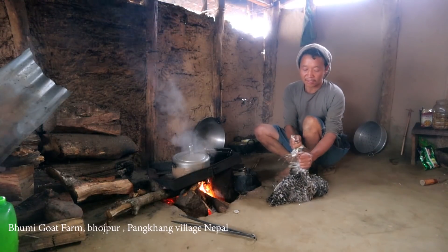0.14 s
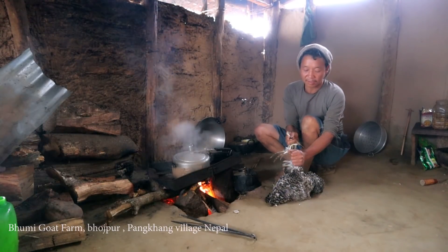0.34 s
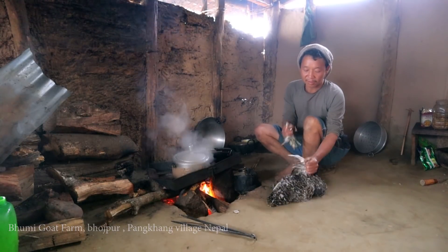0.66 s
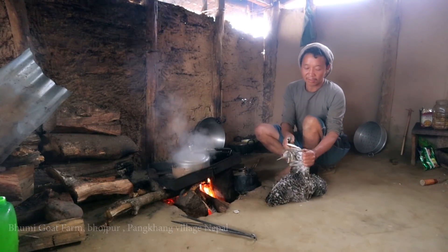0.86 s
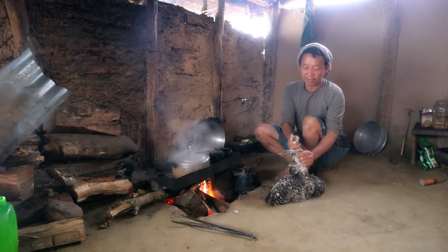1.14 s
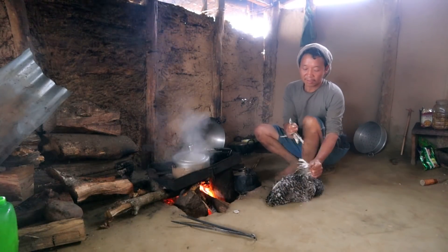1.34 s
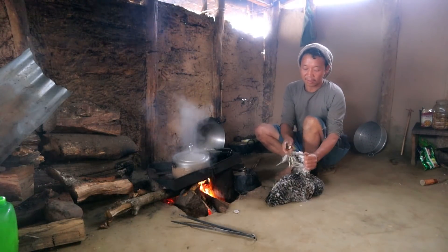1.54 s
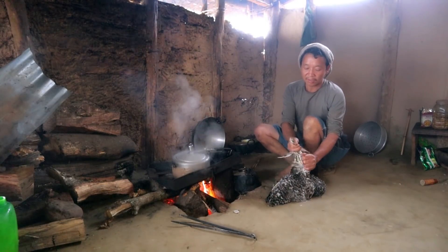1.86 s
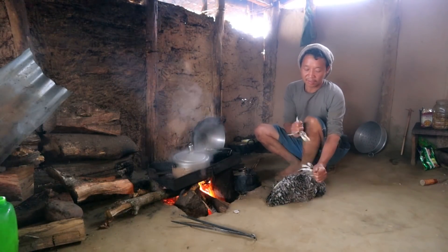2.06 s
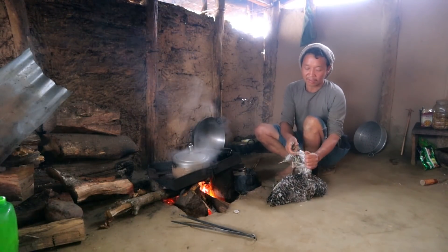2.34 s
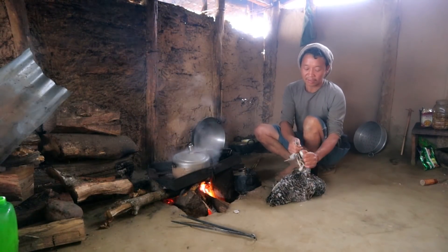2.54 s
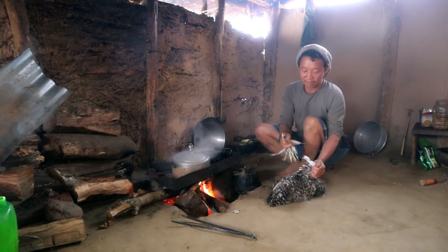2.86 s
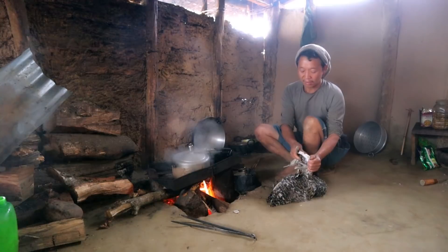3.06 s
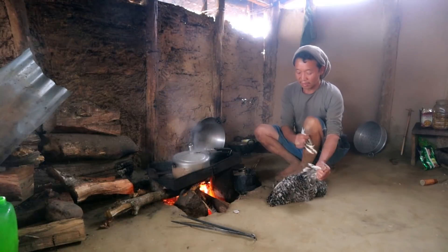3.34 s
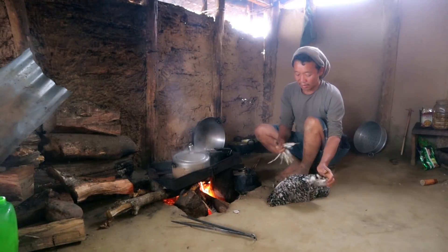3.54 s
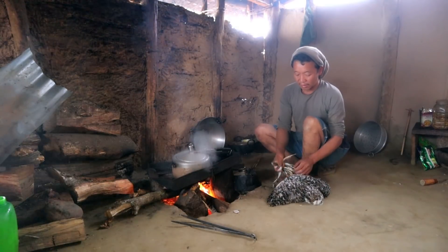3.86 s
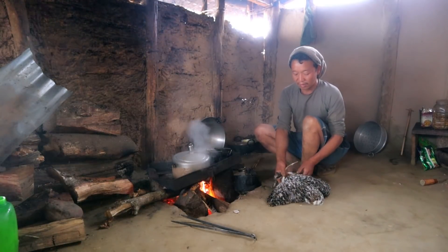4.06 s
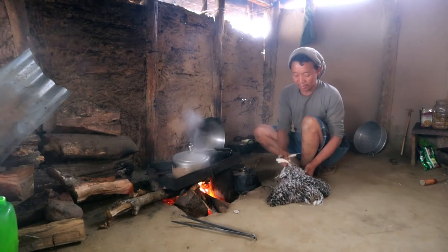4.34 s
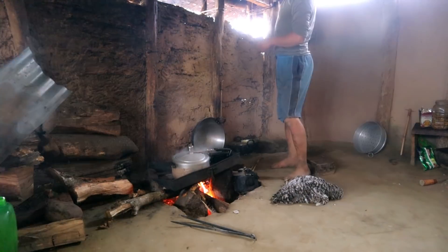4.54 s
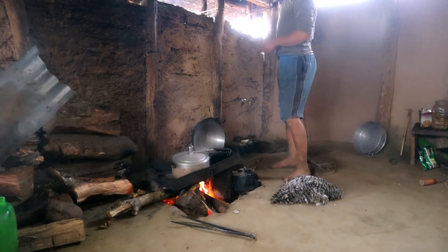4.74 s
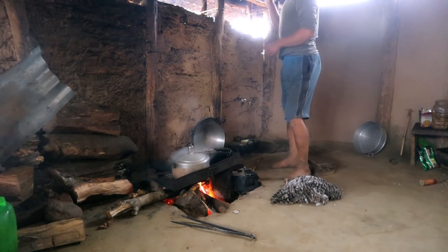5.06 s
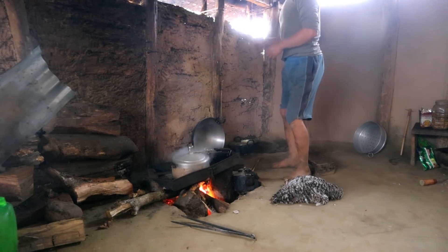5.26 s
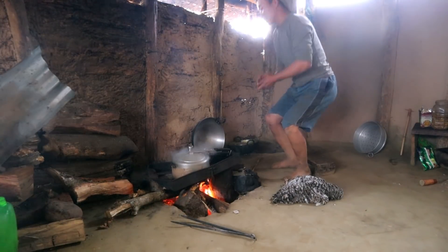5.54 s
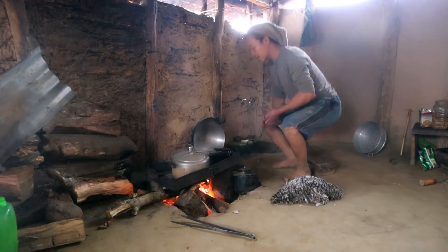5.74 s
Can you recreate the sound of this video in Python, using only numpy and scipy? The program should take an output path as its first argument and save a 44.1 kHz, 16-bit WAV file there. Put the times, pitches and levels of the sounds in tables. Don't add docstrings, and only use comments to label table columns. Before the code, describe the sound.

From 0 to about 4.6 seconds, a pot vents a continuous, smooth, high-pitched steam hiss, concentrated in the upper frequencies with little bass. It grows very slightly and breathes gently. Beneath it sits a barely audible low hearth rumble, with faint taps near 2.0 and 3.4 seconds and a buried, wavering low draught tone around 3.1 to 4.25. At 4.6 the scene cuts abruptly: the hiss becomes clearly louder, brighter and rougher. A hollow metal vessel is dragged, with a low thud near 4.7, a hard mid-pitched bump at 4.84 and bright knocks at 4.87 and 4.95; scraping fades by 5.35. Around 5.68 the jet stops almost instantly as a small metal weight lands with a short click and clink. A faint low ring decays over very quiet room rumble and thin hiss. The stereo image is wide, with short mud-wall reflections.

```python
import sys
import numpy as np
from scipy import signal
from scipy.fft import rfft, irfft, next_fast_len
from scipy.io import wavfile
from scipy.ndimage import uniform_filter1d, map_coordinates

SR = 44100
rng = np.random.default_rng(int(sys.argv[2]) if len(sys.argv) > 2 else 0)


def undo_db(level):
    steps = np.asarray(level, float) / 20
    return 10 ** steps


def master(y):
    cut = np.clip(np.atleast_2d(y).T, -1, 1)
    pcm = np.round(cut * 32767)
    wavfile.write(sys.argv[1], SR, pcm.astype(np.int16))


N = 260190
T = np.arange(N) / SR
CUT = 4.605
SHUT = 5.68


def unit(x):
    return x / np.sqrt(np.mean(x ** 2) + 1e-20)


def along(points, hz):
    f, v = np.transpose(points)
    return np.interp(np.log(hz + 1), np.log(f + 1), v)


def over_time(points):
    s, value = np.transpose(points)
    return np.interp(T, s, value)


def wobble(rate):
    knots = rng.standard_normal(int(N * rate / SR) + 4)
    return map_coordinates(knots, [T * rate])


def filtered(x, response):
    m = next_fast_len(N + SR // 2)
    hz = np.fft.rfftfreq(m, 1 / SR)
    return irfft(rfft(x, m) * response(hz), m)[..., :N]


def resonances(modes):
    def response(f):
        total = 0
        for k, (centre, width, db) in enumerate(modes):
            damping = 1j * f * width
            total = total + (-1) ** k * undo_db(db) * damping / (centre ** 2 - f ** 2 + damping)
        return total
    return response


# (frequency [Hz], time to fall 60 dB [s])
ECHO_TIMES = [(200, 0.54), (1000, 0.14), (4000, 0.2), (12000, 0.13)]


def walls(x):
    hz, t, z = signal.stft(rng.standard_normal((2, SR // 2)), SR, nperseg=256)
    decay = undo_db(-60 * t / along(ECHO_TIMES, hz)[:, None])
    tail = signal.istft(z * decay, SR, nperseg=256)[1]
    tail = tail[:, :SR // 3] / np.linalg.norm(tail[0])
    late = np.pad(x, (130, 0))[None]
    return signal.oaconvolve(late, tail, axes=1)[:, :N]


# (frequency [Hz], likeness [0-1])
LIKENESS = [(25, .97), (60, 1), (130, 0.54), (290, 0), (3000, 0)]


def hush(spectrum):
    def spread(hz):
        angle = np.arccos(np.clip(along(LIKENESS, hz), -1, 1)) / 2
        return undo_db(along(spectrum, hz)) * [np.cos(angle), np.sin(angle)]

    mid, side = filtered(rng.standard_normal((2, N)), spread)
    return np.array([mid + side, mid - side]) / np.std(mid)


# (frequency [Hz], level [dB per Hz])
FLOOR = [(15, -63), (25, -31), (155, -7), (208, -15), (249, -0.5), (306, -27), (345, -7), (450, -43),
         (580, -70), (990, -120)]
# (frequency [Hz], level [dB per Hz])
LEAK_HISS = [(260, -30), (450, 0), (994, -6), (1070, -6), (3830, -11), (6780, -6), (11500, -11),
             (12500, -22), (16200, -52), (22000, -120)]


def floor():
    return undo_db(-70.5) * hush(FLOOR) + undo_db(-74) * hush(LEAK_HISS)


# (frequency [Hz], level [dB per Hz])
FIRE = [(12, -42), (20, -13.5), (119, -3), (198, -4), (291, -1), (338, -5), (631, -6.5), (700, -13),
        (910, -11), (1540, -120)]


def fire():
    start, length, fade = 3.1, 1.15, 0.13
    tone = np.sin(2 * np.pi * np.cumsum(292 + 3 * wobble(12)) / SR)
    draught = np.clip(np.minimum(T - start, start + length - T) / fade, 0, 1)
    return undo_db(-76.5) * hush(FIRE) + draught * undo_db(-79 + 1.8 * wobble(15)) * tone


# (time [s], level [dB])
NUDGES = [
    (4.8, -54.5),
    (4.95, -55),
    (5.08, -62.5),
    (5.6, -74),
    (5.695, -72),
]
# (frequency [Hz], level [dB], time to fall 60 dB [s])
RING_MODES = [(257.4, 0.5, 1.55), (349, 4, 0.57)]


def ring():
    total = np.zeros(N)
    for hz, mode_db, t60 in RING_MODES:
        alive = np.zeros(N)
        for s, db in NUDGES:
            age = np.maximum(T - s, 0)
            alive += undo_db(db - 60 * age / t60) * (1 - np.exp(-age / 0.02))
        level = undo_db(mode_db + 1.5 * wobble(25))
        total += alive * level * np.sin(2 * np.pi * np.cumsum(hz + 3 * wobble(20)) / SR)
    return total


# (time [s], peak level [dB])
LANDING = [
    (5.692, -36.5),
]
# (frequency [Hz], width [Hz], level [dB])
LID = [(257, 19, 0), (337, 53, -8.5), (566, 66, -7), (700, 42, -9), (840, 43, 0.5), (984, 60, -3),
       (1260, 120, -9), (3070, 150, -2.5), (3300, 150, -21)]


def valve():
    rattle, grit = np.zeros(N), rng.standard_normal(N)
    for s, db in LANDING:
        age = np.maximum(T - s, 0)
        click = undo_db(-60 * age / 0.028)
        settling = undo_db(-2.5 - 60 * age / 0.4) * (age < .08)
        rattle += (T > s) * undo_db(db - 9.5) * (click + settling)
    lid = resonances(LID)
    return filtered(grit * rattle, lid) / np.std(filtered(grit, lid))


# (frequency [Hz], level [dB], time to fall 60 dB [s])
WEIGHT_TONES = [(935, -44, .12), (862, -55, .25), (3120, -57, .17), (3340, -57, .17)]


def clink():
    age = np.maximum(T - LANDING[0][0], 0)
    tones = np.zeros(N)
    for hz, db, t60 in WEIGHT_TONES:
        tones += undo_db(db - 60 * age / t60) * np.sin(2 * np.pi * hz * age)
    return tones * (1 - np.exp(-age / .0015))


# time [s], peak level [dB], frequency [Hz], time pressed [s]
HARD_CONTACT = (4.8385, -25.5, 685, .011)


def bump():
    s, db, hz, pressed = HARD_CONTACT
    age = np.maximum(T - s, 0)
    chatter = 1 + .3 * np.cos(2 * np.pi * 190 * age)
    held = undo_db(db - 60 * np.maximum(age - pressed, 0) / .035) * chatter
    tick = sum(undo_db(db - 9 - 60 * age / .05) * np.sin(2 * np.pi * f * age) for f in (880, 1130, 1430))
    onset = 1 - np.exp(-(age / .0012) ** 2)
    return onset * (held * np.sin(2 * np.pi * hz * age) + tick) * undo_db([[1.8], [-1.8]])


# (time [s], level [dB])
PRESSURE = [
    (4.62, -61.5),
    (4.67, -56),
    (4.7, -53.5),
    (4.77, -50),
    (4.82, -41),
    (4.93, -43.5),
    (5.08, -50.5),
    (5.15, -61),
    (5.3, -61),
]
# (frequency [Hz], width [Hz], level [dB])
HOLLOW_BODY = [(70, 60, -23.5), (152, 34, -10.5), (213, 5.1, 3), (257, 7.2, 5), (311, 33, 0),
               (351, 13.5, 7), (437, 67, -6.5)]
# (frequency [Hz], width [Hz], level [dB])
THIN_SHELL = [(534, 72, -4.5), (596, 56, -2), (684, 17, 4.5), (850, 95, -7.5), (1090, 250, -12),
              (1480, 80, -19)]
# (time [s], peak level [dB], low body balance [dB])
TAPS = [
    (2.011, -50, -16),
    (3.359, -54, -9),
    (4.682, -54, 7.5),
    (4.871, -28, -18),
    (4.954, -31, -17),
]


def vessel():
    rub = rng.standard_normal((2, N)) * undo_db([0.97 * wobble(40), 1.2 * wobble(51)])
    moving = (T > CUT) * np.clip((5.36 - T) / 0.058, 0, 1)
    pressure_db = over_time(PRESSURE)
    full_db = -44.5
    shell_db = full_db + 0.5 + 1.25 * (pressure_db - full_db)
    drive_db = [pressure_db, shell_db]
    parts = []
    for k, modes in enumerate([HOLLOW_BODY, THIN_SHELL]):
        answer = resonances(modes)
        force = rub[k] * moving * undo_db(drive_db[k]) / np.std(filtered(rub[k], answer))
        push = np.hanning(31)
        push = push / np.abs(filtered(np.pad(push, (0, N - 31)), answer)).max()
        for s, db, low_db in TAPS:
            force[round(s * SR):][:31] += undo_db(db + low_db * (1.5 - k)) * push
        parts.append(filtered(force, answer))
    body, shell = parts
    return body * undo_db([[-.6], [.6]]) + shell * undo_db([[1.6], [-1.6]])


# (frequency [Hz], width [Hz], boost [dB])
CAVITIES = [(943, 63, 7.5), (1386, 33, 4.5), (1760, 220, 3), (2900, 230, -2), (4330, 330, 2), (5694, 76, 6),
            (8100, 120, 0), (10500, 1100, 3.5)]
# (frequency [Hz], phase [radians])
PORT_PHASE = [(1500, -3), (2300, 2), (3000, 1.5), (4200, 2.05), (5200, 2), (12000, 3.5), (15000, 4.5)]
# (frequency [Hz], level [dB])
ECHO_LEVEL = [(300, 7), (1000, 29.5), (1800, 6), (3500, -0.5), (7000, -3), (11000, 2), (14000, -10.5),
              (15300, -30)]


def jet(level_db, spectrum, patchy_db, flutter_db, pan_db, core_db):
    z = signal.stft(rng.standard_normal((4, N)), nperseg=512)[2]
    patches = rng.standard_normal(z.shape[1:])
    patches = uniform_filter1d(uniform_filter1d(patches, 7, 0), 10, 1)
    drift = rng.standard_normal(z.shape[1:])
    drift = uniform_filter1d(uniform_filter1d(drift, size=14, axis=0), size=70, axis=1)
    colour_db = patchy_db * unit(patches) + 0.8 * unit(drift)
    eddies = signal.istft(z * undo_db(colour_db), nperseg=512)[1][:, :N]
    eddies = eddies * undo_db(flutter_db * wobble(150) + 0.033 * wobble(8.3))
    flow = eddies * undo_db(level_db) * np.exp(-np.maximum(T - SHUT, 0) / 0.0025)

    direct = filtered(flow[0], lambda hz: np.exp(.5j * np.outer([1, -1], along(PORT_PHASE, hz))))
    plume = sum(walls(part) for part in flow[1:]) / np.sqrt(3)
    core = undo_db(core_db)
    echoes = (core * walls(flow[0]) + plume) / np.hypot(core, 1)
    pair = direct + filtered(echoes, lambda hz: undo_db(along(ECHO_LEVEL, hz)))

    def colour(hz):
        boost_db = sum(db / (1 + (2 * (hz - c) / w) ** 2) for c, w, db in CAVITIES)
        wet = undo_db(along(ECHO_LEVEL, hz)) ** 2
        mid = np.cos(along(PORT_PHASE, hz) / 2) ** 2 + wet / 2
        return undo_db(along(spectrum, hz) + boost_db) / np.sqrt(mid)

    pair = filtered(pair, colour)
    heard = T < SHUT
    gain = np.sqrt(np.mean(flow[0, heard] ** 2) / np.mean(pair.mean(0)[heard] ** 2))
    return gain * pair * undo_db(np.array([[pan_db], [-pan_db]]))


# (frequency [Hz], level [dB per Hz])
EARLY_COLOUR = [(180, -49), (300, -44), (337, -39.5), (780, -24), (935, -23.5), (1260, -20.5),
                (1410, -18.5), (1580, -17.5), (2640, -10), (2820, -11.5), (5450, -9), (6980, -9.5),
                (10400, -3.5), (11600, -4), (15400, -27)]


def early_jet():
    level_db = -39 + 0.2527 * T + 0.53 * wobble(2.84)
    return jet(level_db, EARLY_COLOUR, patchy_db=-0.06, flutter_db=0.4, pan_db=0.08, core_db=-7)


# (time [s], level [dB])
LATE_LEVEL = [
    (4.63, -31),
    (4.888, -30),
    (5.12, -31),
    (5.544, -30),
    (5.66, -33),
]
# (frequency [Hz], level [dB per Hz])
LATE_COLOUR = [(290, -36.5), (500, -23), (791, -20), (940, -17), (1070, -20.5), (1740, -10), (2790, -7.5),
               (5560, -3.5), (7000, -2.5), (10600, -1), (11900, 0.5), (14300, -17), (15400, -12)]


def late_jet():
    level_db = over_time(LATE_LEVEL)
    return jet(level_db, LATE_COLOUR, patchy_db=0.76, flutter_db=-0.1, pan_db=0.0, core_db=-2.0)


def scene():
    later = np.clip((T - CUT) / 0.015, 0, 1)
    before = fire() + early_jet()
    after = floor() + late_jet()
    things = ring() + clink() + valve() + bump() + vessel()
    return (1 - later) * before + later * after + things + undo_db(-15) * walls(things.mean(0))


def low_pass(x):
    return signal.sosfilt(signal.butter(12, 15760, fs=SR, output="sos"), x)


def record(dry):
    centre_top = filtered(dry.mean(0), lambda hz: hz > 15250)
    return low_pass(dry - centre_top)


dry = scene()
out = record(dry)
master(out)
```